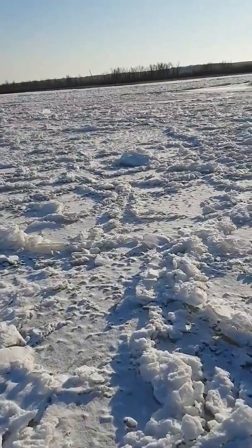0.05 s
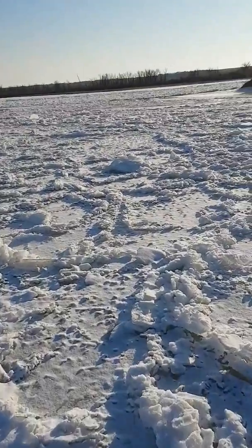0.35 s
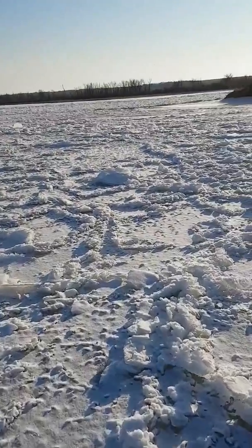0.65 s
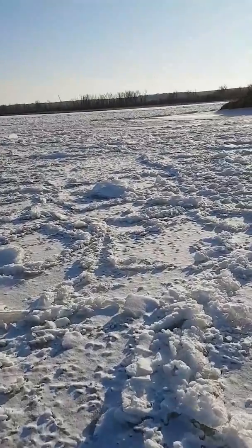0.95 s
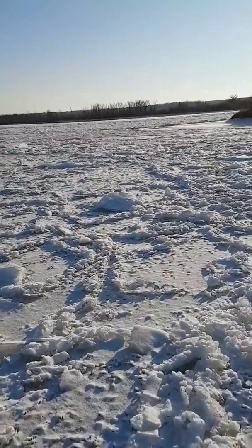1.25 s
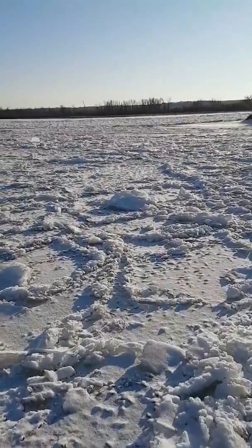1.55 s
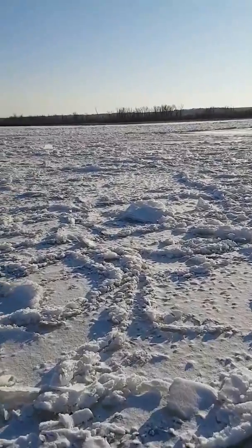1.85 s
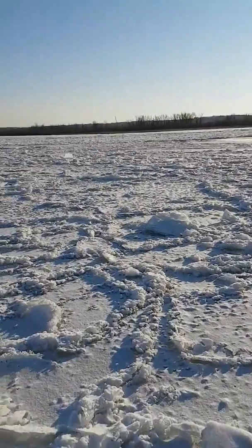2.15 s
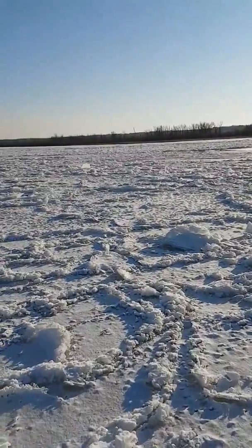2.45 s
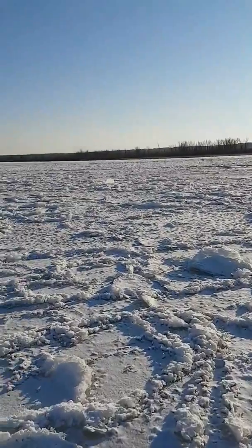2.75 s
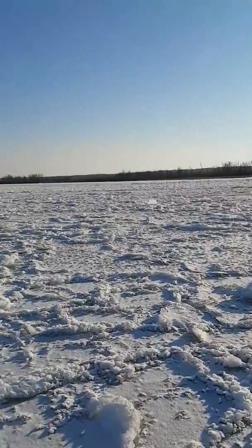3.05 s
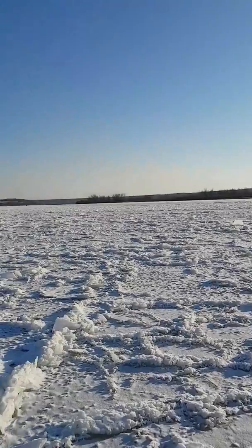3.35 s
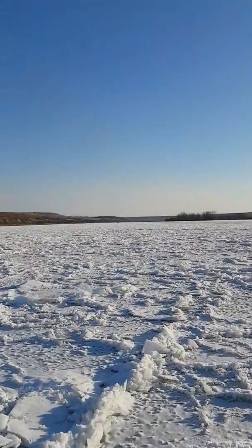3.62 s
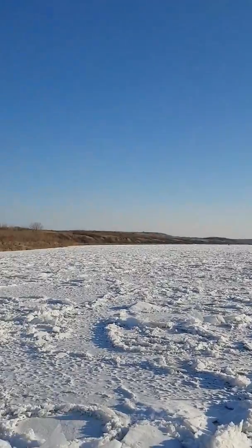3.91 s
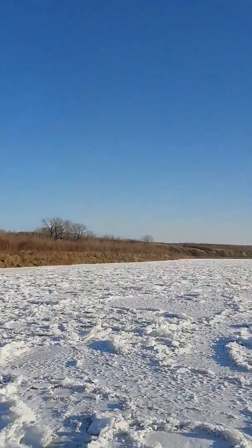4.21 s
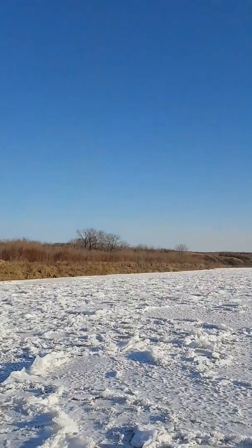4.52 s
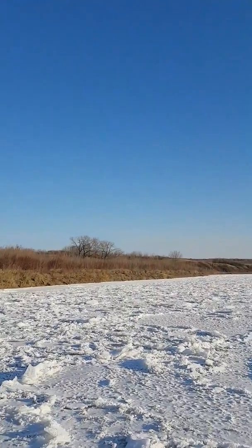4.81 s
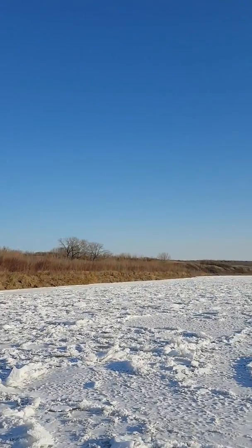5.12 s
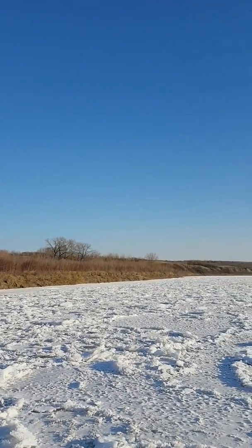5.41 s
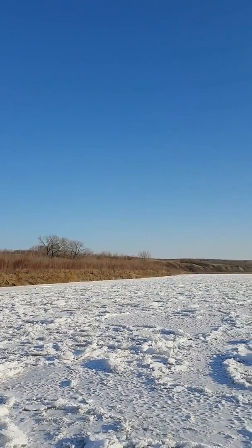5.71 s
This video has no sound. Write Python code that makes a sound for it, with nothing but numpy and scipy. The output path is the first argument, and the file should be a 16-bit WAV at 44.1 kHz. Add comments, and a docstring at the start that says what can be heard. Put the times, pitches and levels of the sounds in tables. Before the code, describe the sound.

Someone walks slowly over snow-covered river ice in the open air, heard from a hand-held microphone. Each step creaks and crunches, with small snaps of breaking crust. A heel knocks on bare ice early on, and past the middle a kicked shard clinks along. A sole slides briefly, the steps fade to a stop, and a finger ticks against the microphone's case over a very faint breeze.

```python
"""Snow-covered river ice, open air: slow steps heard from a hand-held phone.
Packed snow gives way under each boot in stick-slip pulses that speed up to a crunch and slow to snaps.
Crust crumbles, a heel rings the bare slab, a kicked ice shard clinks along, a sole slides on frost.
The walker comes to rest in a light breeze that buffets the microphone ports; a finger taps the case."""
import sys
import numpy as np
from scipy import signal
from scipy.fft import rfft, irfft
from scipy.io import wavfile
from scipy.ndimage import uniform_filter1d

SR = 44100
rng = np.random.default_rng(int(sys.argv[2]) if len(sys.argv) > 2 else 0)


def wav_out(sig):
    """Save sig, one row per channel (or a flat mono array), as 16-bit PCM at SR to the path in sys.argv[1]."""
    wavfile.write(sys.argv[1], SR, np.round(np.clip(np.atleast_2d(sig).T, -1, 1) * 32767).astype(np.int16))


N = 254456
T = np.arange(N) / SR

# spectra of faint breeze and gust rumble: f/Hz, level/dB
AIR_SPECTRUM = [(20, -20), (60, 0.5), (130, 2.5), (300, -0.5), (700, -10), (2000, -10.5), (5000, -28.5),
                (16000, -26.5)]
GUST_SPECTRUM = [(20, -9), (60, -0.5), (110, 1), (200, -16), (500, -50)]
# gust on the ports: t/s, attack/s, hold/s, release/s, level/dB
GUST_SWELL = (4, .5, 0.1, 2.5, -62)
# finger on the case: t/s, level/dB, f/Hz, left-right/dB
FINGER_TAP = (5.7305, -9, 1050, 12)
# port mismatch, scaled per side in at_ports: f/Hz, level/dB
PORT_SPECTRUM = [(100, -2), (800, -0.5), (1800, -3.5), (2800, -5), (4400, -5), (6400, 3.5), (8000, 8),
                 (9800, -14.5), (11000, -11.5), (14500, -1.5)]
# sole sliding on frost: t/s, level/dB
SLIDE_CURVE = [(4.44, -80), (4.52, -49), (4.62, -49), (4.68, -54), (4.74, -49), (4.8, -56), (4.85, -80)]
# sole resonances: f/Hz, width/Hz, level/dB
SOLE_MODES = [(480, 120, -6), (1300, 90, 0), (1750, 140, -10), (2280, 160, -9), (3080, 110, -8)]
# boot weight landing; heel bouncing once on bare ice: t/s, level/dB
BOOT_THUDS = [(1.452, -33), (2.387, -36.5), (3.592, -35.5), (4.149, -34.5), (4.291, -36), (4.331, -37),
              (4.46, -42)]
HEEL_HITS = [(1.4507, -14), (1.4534, -10)]
# ice slab modes: f/Hz, level/dB
SLAB_MODES = [(370, -14.5), (800, -1)]
# thin ice chips ticking: t/s, level/dB, f/Hz
CHIP_TICKS = [(.9295, -26, 4000), (.9302, -28.5, 6000), (1.3925, -35, 11000), (1.4512, -24.5, 4656),
              (1.4538, -24, 10700), (1.477, -28.5, 10790), (1.9985, -37, 11020), (3.4555, -22, 5300),
              (3.475, -29, 5434), (3.494, -43.5, 4000), (3.529, -32, 5300)]
# skittering shard: t/s, level/dB, favoured f/Hz
SHARD_HITS = [(3.4499, -9, 2170), (3.4554, -15, 2298), (3.46, -14, 1403), (3.476, -24, 4950),
              (3.5204, -6, 2040), (3.537, -25, 2200), (3.546, -39, 2200), (3.553, -14, 1570),
              (3.614, -23, 2306), (3.623, -27, 2110), (3.634, -18.5, 1870)]
# shard modes: f/Hz, level/dB, t60/s
SHARD_MODES = [(900, 6.5, 0.016), (1345, -1.5, 0.0347), (1800, -2.5, 0.051), (2001, 0.5, 0.0255),
               (2316, -8.5, 0.047), (2610, -2.5, 0.0195), (3690, -11.5, 0.092), (4668.5, -6.5, 0.025),
               (5220, -31, 0.026)]
# crust caving in: t/s, level/dB, length/s, f/Hz
CRUST_PATCHES = [(0.031, -30, 0.014, 865), (1.129, -34, .014, 2407), (1.421, -29.5, 0.00758, 900),
                 (1.651, -23.5, 0.0055, 1299), (2.412, -28.5, .011, 1707), (2.815, -27.5, .014, 1090),
                 (2.864, -24.5, .014, 1574), (3.066, -34.5, 0.032, 1952), (3.511, -30.5, 0.0092, 785),
                 (3.546, -22, 0.0087, 1500), (4.258, -33, .011, 2698), (4.278, -33.5, .024, 2680),
                 (4.332, -33, 0.024, 2483), (4.507, -29.5, 0.0055, 1800)]
# single short snaps (snow breaking, heel strike and bounce, finger tap rebound): t/s, level/dB, f/Hz
SINGLE_SNAPS = [(.1967, -20, 805), (.4821, -18.5, 1030), (.6703, -22, 830), (.7065, -15.5, 1010),
                (.8575, -22.5, 1200), (.8784, -22.5, 1320), (.9134, -23, 1124), (.9568, -21.5, 1390),
                (1.0005, -19, 1080), (1.045, -20.5, 1540), (1.1333, -19.5, 1094), (1.3921, -23.5, 960),
                (1.4506, -10.5, 1059), (1.4537, -16.5, 770), (1.5066, -22, 766), (1.6485, -18, 1161),
                (1.7825, -12.5, 822.6), (1.8145, -18, 1220), (1.9985, -18, 1056), (2.3677, -18, 1399),
                (2.6095, -22.5, 975.8), (2.7463, -18.5, 979.4), (3.2641, -27, 1291), (3.5924, -25, 621.1),
                (3.7081, -24.5, 970), (3.9323, -29, 1370), (4.0357, -27.5, 675), (4.149, -22, 981),
                (4.2415, -26.5, 1432), (4.2944, -21.5, 1262), (4.3279, -18.5, 1150), (4.4285, -24, 1350),
                (4.8834, -33, 1089), (4.918, -29.5, 1094), (5.002, -41, 1451), (5.065, -41, 1066),
                (5.4578, -31, 1564), (5.522, -31.5, 934), (5.6172, -34, 1136), (5.6844, -34, 1007),
                (5.7346, -33, 1290)]
# runs of snow fractures: first t/s, last t/s, count, first level/dB, last level/dB, f/Hz,
# slowing (1 = even)
SNAP_RUNS = [(.2328, .4323, 7, -27, -26.5, 1030, 1.0), (.754, .817, 4, -28, -25.5, 1300, 1.0),
             (1.923, 1.962, 4, -24, -22, 1200, 1.05), (2.2516, 2.3146, 4, -21.5, -21, 1330, .96),
             (2.5444, 2.5852, 5, -21.5, -23.5, 870, 1.1), (2.6766, 2.7064, 3, -28, -28, 1000, .85),
             (3.142, 3.2174, 4, -19, -24, 860, 1.38)]
# spectra of snaps, deep snow, crust, middling grains, powder: f/Hz, level/dB
SNAP_SPECTRUM = [(50, -49.5), (130, -28.5), (320, -5.5), (1000, 0), (2500, 1.5), (4700, 1.5), (6500, -15.5),
                 (9000, -8.5), (11000, 2), (15000, 1)]
CREAK_SPECTRUM = [(50, -55.5), (120, -12), (210, -14.5), (320, -2.5), (500, 1), (730, 4.5), (1000, 4.5),
                  (1300, -7.5), (2000, -32.5), (5000, -96)]
CRUNCH_SPECTRUM = [(500, -26.5), (950, -4), (1300, 8.5), (1600, 4.5), (2100, 1), (2800, -0.5), (3400, -2),
                   (4600, -5.5), (5600, -31), (8000, -53.5)]
GRIT_SPECTRUM = [(2500, -24.5), (3800, 6), (4600, 2), (5300, -7.5), (6500, -16.5), (9000, -41)]
POWDER_SPECTRUM = [(3000, -2.5), (5500, 7.5), (7500, 5.5), (9000, 2.5), (10700, 6.5), (12500, 4),
                   (14200, 7.5), (16000, 1.5)]
# creak under the standing foot: t/s, level/dB
STANCE_CURVE = [(0, -35), (.4, -39), (.66, -37), (.8, -45), (1.08, -42), (1.27, -44), (1.32, -49),
                (1.42, -54), (1.55, -40), (1.92, -39.5), (2.0, -48), (2.14, -41.5), (2.2, -50), (2.4, -40),
                (2.65, -37), (2.9, -44), (3.2, -39), (3.3, -57), (3.42, -60), (3.7, -44), (4.1, -55),
                (4.35, -46), (4.6, -53.5), (4.86, -56), (4.97, -49), (5.15, -69.5), (5.6, -56),
                (5.77, -67.5)]
# boot brushing loose snow: t/s, length/s, crunch/dB, powder/dB
BOOT_SCUFFS = [(.14, 0.093, -42, -48), (1.2, 0.076, -42, -48), (1.449, .16, -45, -52),
               (1.658, .02, -36, -42), (2.618, .04, -41, -74.5), (3.281, 0.1008, -55, -72),
               (3.46, .08, -46.5, -51), (3.61, 0.022, -41.5, -52.5), (4.03, 0.049, -56, -62.5),
               (4.149, 0.034, -40, -53.5), (4.39, 0.13, -46, -61)]
# boot sinking in: full-weight t/s, attack/s, hold/s, release/s, creak/dB, crunch/dB, powder/dB
BOOT_STEPS = [(0.0, 0.055, .04, 0.19, -34.5, -34, -49.5), (0.559, 0.29, 0.07254, 0.13, -34.5, -28.5, -50.5),
              (1.134, .13, .04, 0.16, -36.5, -30.5, -47.5), (1.788, 0.091, .11, 0.084, -35.5, -31, -47),
              (2.41, 0.06873, .12, .06, -37, -32, -52.5), (3.059, .17, .07, .13, -31, -32, -54),
              (3.741, 0.16, .07, 0.13, -40.5, -36, -56), (4.261, 0.045, 0.0939, 0.061, -38.5, -36.5, -52),
              (4.724, 0.11, .06, 0.091, -43.5, -43, -70)]

PORT_LAG_S, CUTOFF_HZ = 18.5 / SR, 16000
CREAK_RISE_DB_PER_S, CRUNCH_FALL_DB_PER_S, PACKING_S = 45, 8, .15  # snow packing under the sole
SCUFF_CREAK_REL_DB, STANCE_CRUNCH_REL_DB, STANCE_POWDER_REL_DB = -2.5, -2.5, -21
SLOW_SLIPS_PER_S, FAST_SLIPS_PER_S = 62, 280  # standing boot, moving boot


def from_db(db):
    """Decibels to gain."""
    return 10 ** (np.asarray(db) / 20)


def unit_rms(x):
    """Scale to unit power."""
    return x / np.sqrt(np.mean(x ** 2) + 1e-20)


def levelled(x, window_s):
    """Unit power over a sliding window; single pulses stay sharp."""
    size = int(window_s * SR / 2) + 1
    power = uniform_filter1d(uniform_filter1d(np.mean(x ** 2, axis=0), 2 * size), size)
    return x / np.sqrt(np.abs(power) + 1e-12)


def curve_db(rows):
    """Level curve, sample by sample."""
    return np.interp(T, *np.transpose(rows))


def swell_db(t_s, attack_s, hold_s, release_s):
    """0 dB over the hold; 20 dB of slope per attack or release time."""
    return -20 * np.clip(np.maximum((t_s - T) / attack_s, (T - t_s - hold_s) / release_s), 0, 10)


def add(track, t_s, sound):
    """Mix a short sound in at t_s."""
    start = int(np.clip(round(t_s * SR), 0, N - 1))
    track[start:start + len(sound)] += sound[:N - start]


def coloured(x, spectrum, db_scale=1):
    """Minimum-phase filter that follows a spectrum."""
    size = 4096
    hz, db = np.transpose(spectrum)
    bins_hz = np.fft.rfftfreq(size, 1 / SR)
    bins_db = np.interp(np.log(bins_hz + 1), np.log(hz), db)
    cepstrum = irfft(db_scale * np.log(from_db(bins_db)))
    cepstrum[1:size // 2] *= 2
    cepstrum[size // 2 + 1:] = 0
    impulse = irfft(np.exp(rfft(cepstrum)))
    return signal.oaconvolve(np.atleast_2d(x), impulse[None], axes=-1)[:, :N]


def low_cut(x, edge_hz):
    """Gentle high-pass: little sound below the edge."""
    return signal.sosfilt(signal.butter(2, edge_hz, "high", fs=SR, output="sos"), x)


def ring(hz, t60_s):
    """Damped sine."""
    t = T[:int(t60_s * SR) + 2]
    return np.sin(2 * np.pi * hz * t) * from_db(-60 * t / t60_s)


def knocks(rows, cycles):
    """Contacts ring briefly; a smooth onset keeps each near its pitch."""
    out = np.zeros(N)
    for t_s, db, hz in rows:
        swing = ring(hz, cycles / hz)
        swing *= 1 - np.exp(-hz * T[:len(swing)])
        add(out, t_s, from_db(db) * swing / np.abs(swing).max())
    return out


def grains(per_s, spread_db, size):
    """Crystals break at random moments, most of them faintly."""
    breaking = rng.random(size) < per_s / SR
    polarity = rng.choice([-1, 1], size)
    level_db = spread_db * np.minimum(rng.exponential(1, size), 4)
    return unit_rms(breaking * polarity * from_db(level_db))


def breeze(level_db):
    """Steady low noise of moving air, partly common to both ports."""
    noise = rng.standard_normal(N) + 1.5 * rng.standard_normal((2, N))
    return from_db(level_db) * unit_rms(coloured(noise, AIR_SPECTRUM))


def gust():
    """Wind buffets each port separately: a rumble that swells and dies."""
    t_s, attack_s, hold_s, release_s, db = GUST_SWELL
    rumble = unit_rms(coloured(rng.standard_normal((2, N)), GUST_SPECTRUM))
    return from_db(db + swell_db(t_s, attack_s, hold_s, release_s)) * rumble


def finger_tap(click_db):
    """Dry tick on the case by the left port: one pressure swing with a sharp edge."""
    t_s, db, hz, side_db = FINGER_TAP
    phase = 2 * np.pi * hz * (T - t_s)
    swing = phase / (1 + phase ** 2) ** 2
    add(swing, t_s, from_db(click_db) * np.array([-1, 1]))
    return swing * from_db(db) * from_db([[side_db / 2], [-side_db / 2]])


def scattered(x, wet_db, decay_s):
    """Legs and rough ice return short echoes, different at each port."""
    t = T[:SR // 10]
    echoes = rng.standard_normal((2, len(t))) * np.exp(-t / decay_s) * (t > .002)
    echoes /= np.linalg.norm(echoes, axis=1, keepdims=True)
    return x + from_db(wet_db) * signal.oaconvolve(x, echoes, axes=-1)[:, :N]


def at_ports(x):
    """Ground sound reaches the right port first; each port has its own colour."""
    upsampled = signal.resample_poly(x[0], 2, 1)
    left = np.interp(2 * SR * (T - PORT_LAG_S), np.arange(len(upsampled)), upsampled, left=0)
    return np.vstack([coloured(left, PORT_SPECTRUM, db_scale=.81),
                      coloured(x[1], PORT_SPECTRUM, db_scale=-.48)])


def sole_slide():
    """Fine frost grains rub the sole and sound its resonances."""
    rub, out = grains(per_s=9000, spread_db=5.5, size=N), 0
    for hz, width_hz, db in SOLE_MODES:
        resonance = signal.lfilter(*signal.iirpeak(hz, hz / width_hz, fs=SR), rub)
        out += from_db(db) * unit_rms(resonance)
    return from_db(curve_db(SLIDE_CURVE)) * unit_rms(out)


def boot_blows(thud_hz):
    """Weight thuds through the snow; the heel rings the bare slab."""
    thuds = [(t_s, db, thud_hz) for t_s, db in BOOT_THUDS]
    heel = [(t_s, db + mode_db, hz) for t_s, db in HEEL_HITS for hz, mode_db in SLAB_MODES]
    return knocks(thuds, cycles=2.8) + knocks(heel, cycles=3.4)


def ice_shard(focus_octaves, spill, detune, crack_db, crack_s):
    """Each hit opens with a gritty crack; the edge that lands favours modes near one pitch."""
    out, t = np.zeros(N), T[:SR // 40]
    hz, level_db, t60_s = np.transpose(SHARD_MODES)
    crack_band = signal.butter(2, [650, 6000], "band", fs=SR, output="sos")
    for t_s, db, favoured_hz in SHARD_HITS:
        focus = np.exp(-(np.log2(hz / favoured_hz) / focus_octaves) ** 2)
        share = from_db(level_db) * (spill + focus)
        loaded_hz = hz * (1 + detune * rng.standard_normal(len(hz)))  # snow contact shifts the modes
        for gain, mode_hz, mode_t60_s in zip(share / np.linalg.norm(share), loaded_hz, t60_s):
            add(out, t_s, from_db(db) * gain * rng.choice([-1, 1]) * ring(mode_hz, mode_t60_s))
        crack = rng.standard_normal(len(t)) * np.exp(-t / crack_s)
        add(out, t_s, from_db(db + crack_db) * signal.sosfilt(crack_band, crack))
    return out


def crust_crumbles(cycles):
    """Crust caves in as a quick run of small fractures."""
    out = np.zeros(N)
    for t_s, db, length_s, hz in CRUST_PATCHES:
        size = int(length_s * SR)
        run = grains(per_s=4500, spread_db=1, size=size) * signal.windows.tukey(size, .5)
        add(out, t_s, from_db(db) * unit_rms(np.convolve(run, ring(hz, cycles / hz))))
    return out


def snap_events(scatter_db, detune):
    """Single snaps, plus packed snow yielding in nearly even runs. Rows: t/s, level/dB, f/Hz."""
    rows = list(SINGLE_SNAPS)
    for run, draws in zip(SNAP_RUNS, rng.standard_normal((len(SNAP_RUNS), 20, 2))):
        first_s, last_s, count, first_db, last_db, hz, slowing = run
        for along, (louder, higher) in zip(np.linspace(0, 1, round(count)), draws):
            t_s = first_s + (last_s - first_s) * along ** slowing
            db = first_db + (last_db - first_db) * along + scatter_db * louder
            rows.append((t_s, db, hz * np.exp(detune * higher)))
    return rows


def snap_clicks(events, click_db):
    """Each snap opens with a bright click, stronger in the higher ones."""
    out = np.zeros(N)
    for t_s, db, hz in events:
        add(out, t_s, [from_db(db + click_db) * hz / 1000])
    return coloured(out, POWDER_SPECTRUM)


def snaps(events, cycles, noise_db, lead_s, trail_s, energy_s):
    """One heavily damped swing with a noise trail; a brief noise lead-in softens the attack."""
    onset = SR // 200
    out, t = np.zeros(N), T[:SR // 40] - onset / SR
    for t_s, db, hz in events:
        noise = rng.standard_normal(len(t)) * np.exp(-np.abs(t) / np.where(t < 0, lead_s, trail_s))
        force = from_db(noise_db) * noise / np.linalg.norm(noise)
        force[onset] += 1
        snap = np.convolve(force, ring(hz, cycles / hz))
        snap *= np.sqrt(energy_s * SR / np.sum(snap ** 2))
        add(out, t_s - onset / SR, from_db(db) * snap)
    return out


def crystals(per_s, spread_db, cycles, pitches):
    """Grains of many sizes, each ringing briefly at its own pitch."""
    breaking = grains(per_s, spread_db, N)
    pitch_index, out = rng.integers(0, pitches, N), 0
    for k, hz in enumerate(np.geomspace(350, 5500, pitches)):
        ping = ring(hz, cycles / hz)
        ping *= np.sqrt(hz) / np.linalg.norm(ping)
        out += signal.oaconvolve(breaking * (pitch_index == k), ping)[:N]
    return unit_rms(out)


def stick_slip(slips_per_s, jitter, spread_db, trail_db, trail_s):
    """Nearly even slip pulses, each with a short trail of breaking crystals."""
    thresholds = np.cumsum(np.exp(jitter * rng.standard_normal(N // 100)))
    at = np.searchsorted(np.cumsum(slips_per_s) / SR, thresholds)
    sizes = from_db(spread_db * np.clip(rng.standard_normal(len(at)), -2, 2))
    pulses = np.zeros(N)
    pulses[at[at < N]] = sizes[at < N]
    envelope = signal.lfilter([1], [1, -np.exp(-1 / (trail_s * SR))], pulses + 1e-18)
    trail = envelope * rng.standard_normal(N)
    lead = int(trail_s * SR / 2)  # brief noise lead-in softens each attack
    return unit_rms(pulses) + from_db(trail_db) * unit_rms(np.pad(trail[lead:], (0, lead)))


def footwork():
    """Steps, scuffs and stance set creak, crunch and powder gains; loose snow slips faster."""
    power, loose_power = np.zeros((3, N)), np.zeros(N)
    for t_s, attack_s, hold_s, release_s, creak_db, crunch_db, powder_db in BOOT_STEPS:
        from_mid_hold_s = np.clip(T - t_s, 0, hold_s) - hold_s / 2
        levels_db = [creak_db + CREAK_RISE_DB_PER_S * from_mid_hold_s,
                     crunch_db - CRUNCH_FALL_DB_PER_S * from_mid_hold_s, np.full(N, powder_db)]
        step = from_db(levels_db + swell_db(t_s, attack_s, hold_s, release_s)) ** 2
        power += step
        loose_power += step[1] / (1 + (np.maximum(T - t_s, 0) / PACKING_S) ** 4)
    for t_s, length_s, crunch_db, powder_db in BOOT_SCUFFS:
        gains = from_db([crunch_db + SCUFF_CREAK_REL_DB, crunch_db, powder_db])
        envelope = from_db(swell_db(t_s, attack_s=.03, hold_s=length_s, release_s=.065))
        scuff = np.outer(gains, envelope) ** 2
        power += scuff
        loose_power += scuff[1]
    stance_gains = from_db([0, STANCE_CRUNCH_REL_DB, STANCE_POWDER_REL_DB])
    power += np.outer(stance_gains, from_db(curve_db(STANCE_CURVE))) ** 2
    looseness = loose_power / power[1]
    slips_per_s = SLOW_SLIPS_PER_S * (FAST_SLIPS_PER_S / SLOW_SLIPS_PER_S) ** (looseness ** 2)
    return *np.sqrt(power), slips_per_s


def tread(grit_db):
    """The same slips shake deep snow, crack crust and stir powder; finer grains scatter more."""
    creak_gain, crunch_gain, powder_gain, slips_per_s = footwork()
    crushing = (slips_per_s / 200) ** 1.3  # fast slips crush the snow between them
    slip = stick_slip(slips_per_s, jitter=.25, spread_db=4.2, trail_db=-4, trail_s=.0011)
    crushed = crushing * crystals(per_s=5000, spread_db=3, cycles=5, pitches=24)
    spray = crushing * grains(per_s=5500, spread_db=7.5, size=(2, N))
    sifting = np.sqrt(crushing) * rng.standard_normal((2, N))
    ticks = grains(per_s=500, spread_db=7.5, size=(2, N))
    creak = coloured(slip + from_db(-5) * crushed, CREAK_SPECTRUM)
    crunch = coloured(slip + from_db(2) * crushed + from_db(-2) * spray, CRUNCH_SPECTRUM)
    grit = coloured(slip + from_db(6) * crushed + from_db(11.5) * spray, GRIT_SPECTRUM)
    powder = coloured(from_db(-16) * slip + from_db(-4) * ticks + sifting, POWDER_SPECTRUM)
    grit_gain = from_db(grit_db) * np.sqrt(crunch_gain * powder_gain)
    return (creak_gain * levelled(creak, window_s=.028) + crunch_gain * levelled(crunch, window_s=.019)
            + grit_gain * levelled(grit, window_s=.022) + powder_gain * levelled(powder, window_s=.053))


def scene():
    """Snow and ice at the feet, over a faint breeze."""
    events = snap_events(scatter_db=.8, detune=.06)
    snapping = snaps(events, cycles=3.73, noise_db=-3, lead_s=.0014, trail_s=.00272, energy_s=.00313)
    crackle = coloured(snapping + crust_crumbles(cycles=4.2), SNAP_SPECTRUM)
    shard = ice_shard(focus_octaves=.14, spill=.26, detune=.015, crack_db=-14.5, crack_s=.0038)
    ice = low_cut(shard + knocks(CHIP_TICKS, cycles=25), edge_hz=490)
    boots = low_cut(boot_blows(thud_hz=128.8) + sole_slide(), edge_hz=154)
    ground = boots + ice + crackle + snap_clicks(events, click_db=-12.5) + tread(grit_db=1.24)
    air = breeze(level_db=-62)
    walk = at_ports(scattered(ground, wet_db=-18, decay_s=.009))
    return air + gust() + finger_tap(click_db=-14.5) + walk


def record(dry):
    """Soft peak limit, then a steep low-pass."""
    limited = dry / (1 + (dry / .85) ** 4) ** .25
    return signal.sosfilt(signal.ellip(12, .1, 80, CUTOFF_HZ, fs=SR, output="sos"), limited)


dry = scene()
out = record(dry)
wav_out(out)
```